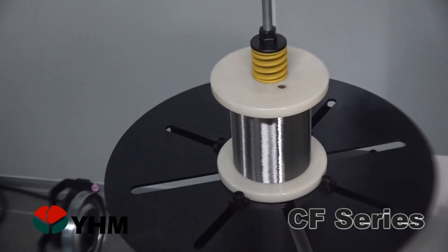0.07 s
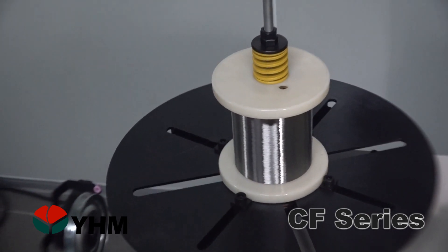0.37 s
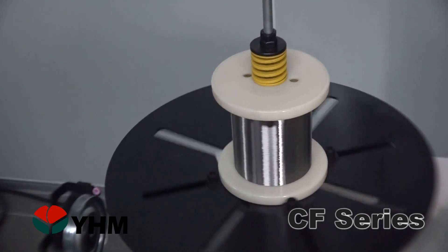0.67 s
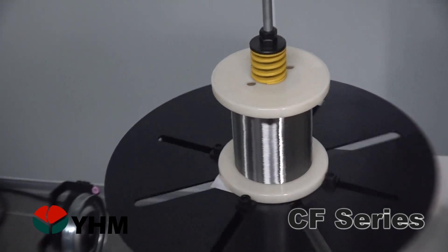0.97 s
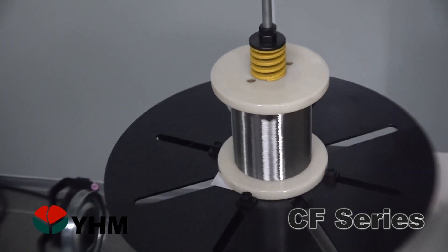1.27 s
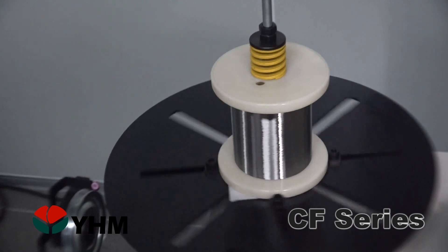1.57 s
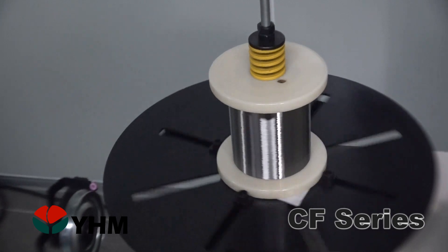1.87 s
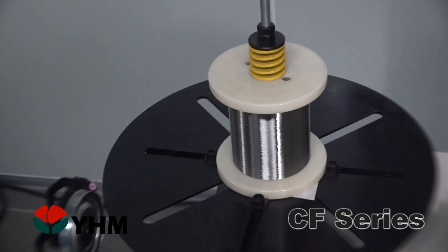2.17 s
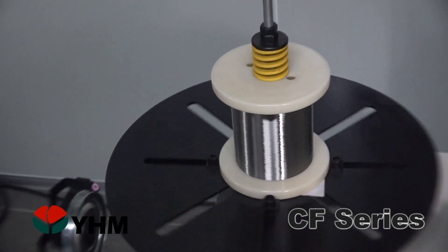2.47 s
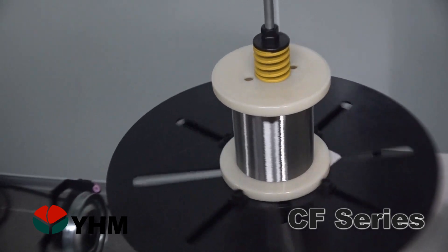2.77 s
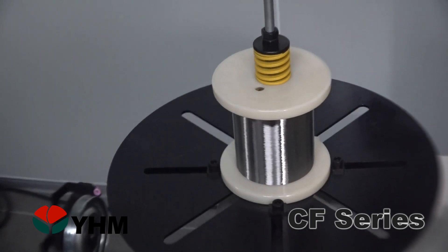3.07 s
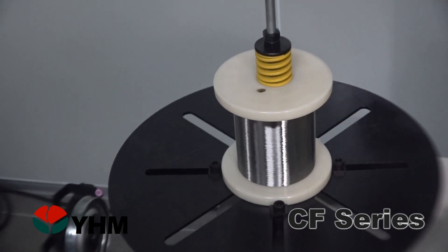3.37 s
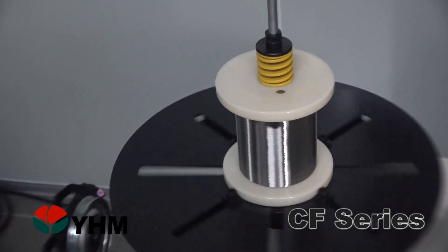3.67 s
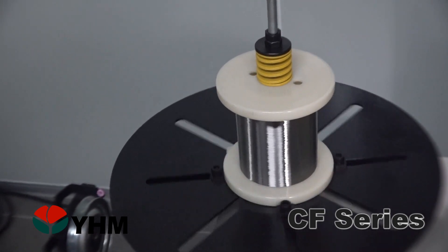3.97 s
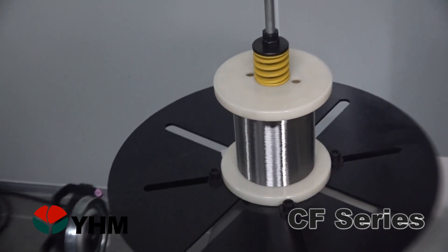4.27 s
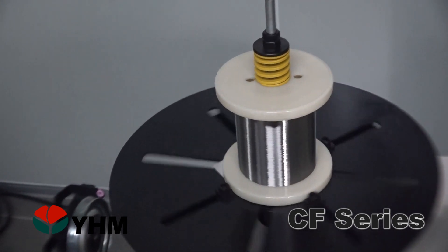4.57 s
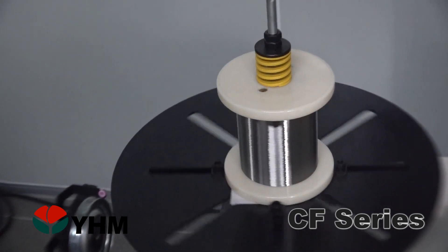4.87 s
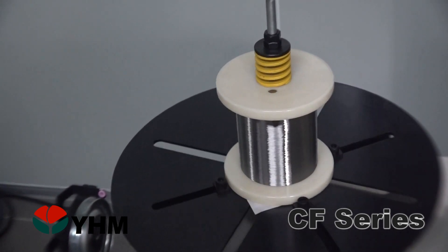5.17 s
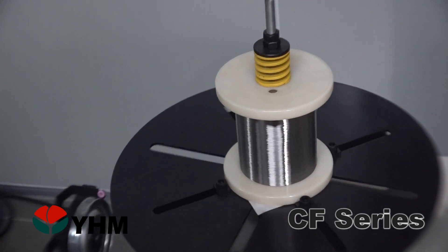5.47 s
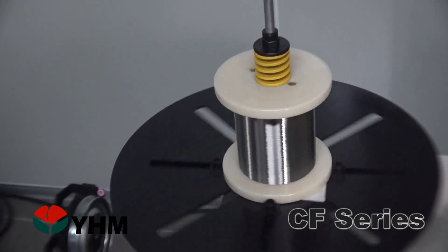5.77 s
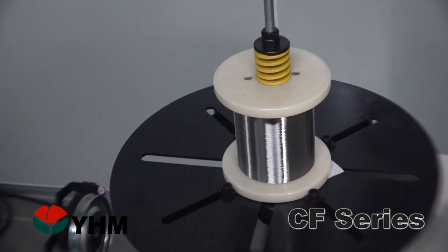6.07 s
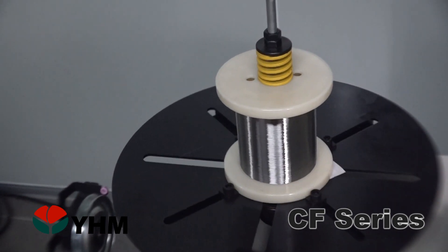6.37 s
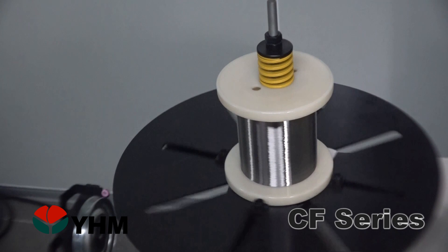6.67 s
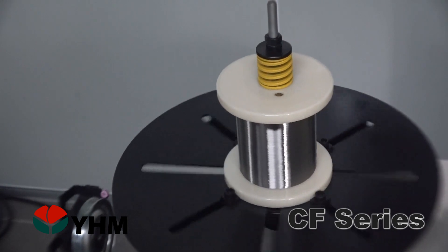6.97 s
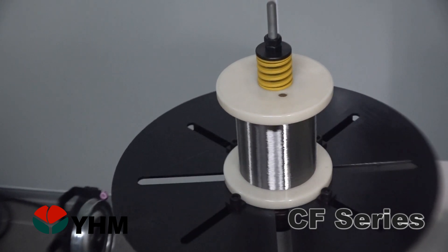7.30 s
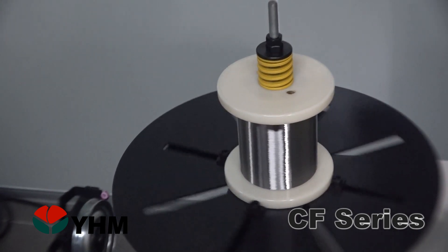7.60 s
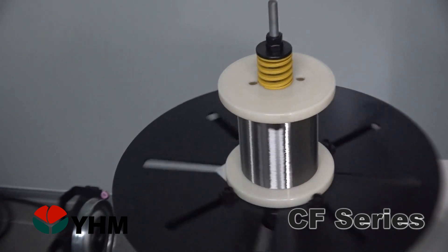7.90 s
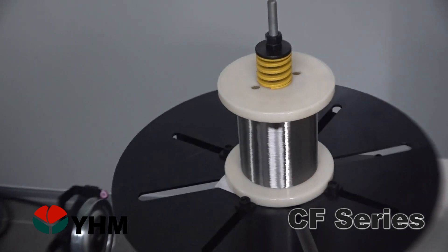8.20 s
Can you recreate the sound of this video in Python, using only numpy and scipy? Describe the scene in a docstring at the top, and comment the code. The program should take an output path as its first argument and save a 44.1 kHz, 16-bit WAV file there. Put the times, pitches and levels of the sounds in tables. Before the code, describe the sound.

A spring coiling machine runs in a workshop with a steady low motor hum and fan roar. About once a second a valve spits open and compressed air hisses for just over half a second, now and then with a faint whistle. Later blasts last slightly longer, and a quick blip comes near the end. The hiss sounds close and leaves a short echo in the hall.

```python
"""Spring coiler with air blasts

A spring coiling machine runs in a workshop, motors and fans humming over a steady roar. About once a second a
valve spits open and a jet of compressed air hisses, the later blasts mostly longer; a blip and a shorter blast
come last. Metal parts colour the jet, which at times whistles on an edge. The hiss bounces off nearby machine
parts and dies away in the hall."""
import sys
import numpy as np
from scipy import signal
from scipy.fft import rfft, irfft
from scipy.io import wavfile
from scipy.ndimage import uniform_filter1d

SR = 44100
rng = np.random.default_rng(int(sys.argv[2]) if len(sys.argv) > 2 else 0)


def unload_audio(sound):
    """Save the sound as a 16-bit wav file, at the path given as the first command line argument."""
    columns = np.transpose(np.atleast_2d(sound))
    # keep every value between -1 and 1, then stretch to whole-number steps
    steps = np.round(np.clip(columns, -1, 1) * 32767)
    wavfile.write(sys.argv[1], SR, steps.astype(np.int16))


N = 372204

# motor and fan tones: (frequency [Hz], level [dB], waver depth [ratio])
MOTOR_TONES = [(120.8, -63, .3), (151.6, -65.5, 0.7), (180.45, -49, 0.26), (189.2, -51, 0.32),
               (203.2, -64, 0.79), (210, -59.5, 0.56), (246.5, -63, 0.48), (352.4, -62, 1),
               (359.5, -57.5, 0.94), (382, -59.5, 0.54), (477.4, -57.5, 0.7), (482, -58, .5),
               (485.5, -60.5, 0.47), (536, -60, 0.43), (564.7, -56.5, 0.44), (798, -65.5, 0.47)]
# slow level ride on the low, beating pair of motor tones: (time [s], gain [dB])
DRONE_RIDE = [(0, -1.5), (2, -1.5), (3.1, 0.5), (3.6, 2.5), (5.3, 2), (5.7, -0.5), (8.44, -1)]
# slow level ride on the fan whine: (time [s], gain [dB])
WHINE_RIDE = [(0, 3), (1, 2.5), (1.6, -9.5), (2.7, 8), (3.2, -0.5), (4, 2.5), (6, -3.5), (7.5, 2),
              (8.1, -5)]
# colour of the machine roar: (frequency [Hz], relative level [dB])
ROAR_COLOUR = [(20, -24), (45, -14), (95, -13), (130, -1), (210, 0), (310, -6), (500, -5), (750, -9),
               (1300, -10), (2300, -20.5), (4600, -24), (6300, -38), (10500, -39), (15500, -47)]
# how alike the roar is left and right: (frequency [Hz], correlation [0-1])
ROAR_LIKENESS = [(30, .98), (70, 0.89), (180, 0.99), (400, 0.93), (1200, 0.88), (4000, 0.66), (12000, 0.16)]
# valve cues, one row a blast: (opens [s], starts to shut [s], shutting time [s])
BLASTS = [(.397, .968, .025), (1.411, 1.982, .025), (2.426, 2.997, .025), (3.442, 4.01, .03),
          (4.464, 5.078, .03), (5.475, 6.143, .055), (6.494, 7.203, .025), (7.503, 8.172, .055),
          (8.210, 8.305, .012), (8.425, 8.9, .025)]
# broad colour of the jet: (frequency [Hz], relative level [dB])
NOZZLE_COLOUR = [(500, -35), (1400, -21.5), (1900, -13), (2550, -16), (3100, -15), (3750, -7),
                 (4600, -11.5), (6200, -12.5), (7800, -5), (8900, -12.5), (10200, -3), (11200, -9),
                 (12700, -6.5), (13550, 0), (14700, -6)]
# narrow resonances of the metal around the jet: (frequency [Hz], width [Hz], unscaled boost [dB])
CAVITIES = [(1694, 38, 7.0), (1630, 38, 4.2), (1940, 38, 4.0), (3415, 38, 2.4), (4011, 38, 6.6),
            (4263, 59, 4.2), (4483, 38, 4.6), (4906, 38, 4.8), (5067, 79, 5.7), (5449, 53, 4.0),
            (5622, 38, 4.2), (6202, 38, 3.4), (6583, 38, 3.7), (7367, 39, 6.4), (7552, 100, 4.0),
            (7890, 41, 5.4), (8067, 43, 7.0), (8328, 57, 6.6), (8483, 38, 5.7), (8883, 130, 5.4),
            (9164, 38, 5.0), (9465, 38, 4.9), (9831, 38, 7.0), (10078, 38, 5.0), (10510, 50, 3.8),
            (10710, 38, 3.3), (11840, 38, 6.6), (12265, 40, 5.1), (13267, 38, 3.0), (13647, 38, 3.5),
            (13828, 38, 4.5), (14002, 38, 4.5), (14597, 38, 5.5)]
# colour of the spit as the valve cracks open: (frequency [Hz], relative level [dB])
SPIT_COLOUR = [(500, -7), (1200, -3), (3300, 7), (5500, -15), (9000, -19), (14000, 6.5)]
# slaps off the nearest surfaces: (delay [s], signed gain [ratio])
ECHOES = [(.001315, -.09), (.001837, -.05), (.00229, -.05), (.005034, .1), (.005261, .05), (.005714, .07),
          (.007347, -.06), (.007438, .07)]
# ring of the hall: (frequency [Hz], time to fall 60 dB [s])
HALL_DECAY = [(1000, 0.45), (4000, 1.97), (8000, 1.03), (11000, 1.13), (14000, 0.56), (16000, 0.65)]
# flares of the whistle: (peak time [s], level at steady flow [dB])
FLARES = [(.46, -44), (1.70, -40.5), (2.51, -41), (3.52, -45), (4.72, -44), (4.88, -43), (5.04, -42),
          (5.57, -43), (5.72, -45), (5.89, -44)]
# stereo balance: (frequency [Hz], left minus right [dB])
BALANCE = [(60, 0.5), (200, -0.8), (700, -1.5), (1300, -1.5), (2400, -0.5), (5000, -0.8), (9000, -1),
           (13000, -0.2)]

VALVE_OPENS_S, TOP_HZ = .006, 15780


def gain_of(db):
    """Decibels to amplitude."""
    return 10 ** (np.asarray(db) / 20)


def unit_rms(x):
    """Scales to rms 1."""
    return x / np.sqrt(np.mean(x ** 2) + 1e-20)


def curve_at(points, hz):
    """Reads a table of (frequency [Hz], value) on a log-frequency axis."""
    f, value = np.transpose(points)
    return np.interp(np.log(hz + 1), np.log(f + 1), value)


def drift(rate_hz, size=8192):
    """Slow random motion of rms 1, up to about the given rate."""
    hz = np.fft.rfftfreq(size, N / SR / size)
    slow = irfft(rfft(rng.standard_normal(size)) / (1 + (hz / rate_hz) ** 4), size)
    return unit_rms(np.interp(np.arange(N) * size / N, np.arange(size), slow))


def minimum_phase(db, size=4096):
    """Unit-energy response with the given dB spectrum, ringing only after the impulse."""
    log_gain = np.log(gain_of(np.r_[db, db[-2:0:-1]]))
    taps = np.fft.ifft(np.exp(np.conj(signal.hilbert(log_gain)))).real[:size]
    return taps / np.linalg.norm(taps)


def convolve(x, taps):
    """Plays a mono sound through one response per channel."""
    return signal.fftconvolve(x[None], np.atleast_2d(taps), axes=1)[:, :N]


def motor_hum(waver_share=0.014, side_db=-20, swell_db=2.5, swell_hz=2.2):
    """Motor and fan tones waver in level and phase; close pairs beat, and each swells at random."""
    t, out = np.arange(N) / SR, np.zeros((2, N))
    for hz, db, waver in MOTOR_TONES:
        level_db = db + swell_db * waver * drift(swell_hz)
        for low_hz, high_hz, ride in ((172, 196, DRONE_RIDE), (470, 490, WHINE_RIDE)):
            if low_hz < hz < high_hz:
                level_db += np.interp(t, *np.transpose(ride))
        waver_hz = waver_share * hz  # higher tones waver faster
        wobble = (drift(waver_hz) + 1j * drift(waver_hz)) / np.sqrt(2)
        swing = (1 + waver * wobble) / np.hypot(1, waver)
        tone = np.sqrt(2) * gain_of(level_db) * swing * np.exp(2j * np.pi * (hz * t + rng.random()))
        side = 1j * gain_of(side_db) * rng.choice([-1, 1])  # reaches one ear a little earlier
        out += np.real([tone * (1 + side), tone * (1 - side)])
    return out


def machine_roar(level_db=-42, swell_db=1.0, swell_hz=6):
    """A gently swelling bed of drive and fan noise, centred in the bass and wider in the treble."""
    hz = np.fft.rfftfreq(N, 1 / SR)
    left, other = rfft(rng.standard_normal((2, N)))
    alike = curve_at(ROAR_LIKENESS, hz)
    right = alike * left + np.sqrt(1 - alike ** 2) * other
    bed = irfft(np.array([left, right]) * gain_of(curve_at(ROAR_COLOUR, hz)), N)
    return gain_of(level_db + swell_db * drift(swell_hz)) * unit_rms(bed)


def airflow(surge_db=1.8, surge_s=.08, refill_s=.42):
    """The valve snaps open with a surge, stronger the more the hose has refilled; then the flow holds."""
    t, flow = np.arange(N) / SR, np.zeros(N)
    last_stop = -np.inf
    for start, stop, shut_s in BLASTS:
        age = np.maximum(t - start, 0)
        charge = min((start - last_stop) / refill_s, 1) ** 2
        valve = np.clip(age / VALVE_OPENS_S, 0, 1) * np.clip(1 - (t - stop) / shut_s, 0, 1)
        flow += valve * gain_of(charge * surge_db * np.exp(-age / surge_s))
        last_stop = stop
    return flow


def air_jet(flow, level_db=-28.5, flutter_db=0.86, flutter_hz=12, boost_scale=1.1, bands=16):
    """Turbulent hiss whose bands flutter apart as the stream wanders, coloured by nozzle and cavities."""
    hz = np.fft.rfftfreq(N, 1 / SR)
    white, centres = rfft(rng.standard_normal(N)), np.linspace(0, TOP_HZ, bands)
    eddies = np.zeros(N)
    for band in np.eye(bands):
        hiss = irfft(white * np.interp(hz, centres, band), N)
        eddies += hiss * gain_of(flutter_db * drift(flutter_hz))
    filter_hz = np.fft.rfftfreq(8192, 1 / SR)
    peaks = sum(db / (1 + (2 * (filter_hz - f) / width) ** 2) for f, width, db in CAVITIES)
    colour = minimum_phase(curve_at(NOZZLE_COLOUR, filter_hz) + boost_scale * peaks)
    return gain_of(level_db) * convolve(unit_rms(eddies) * flow, colour)[0]


def valve_spit(level_db=-34, fade_s=0.051):
    """The air stored behind the valve leaves first: a short puff on the front of each blast."""
    age = np.maximum(np.arange(N) / SR - np.array(BLASTS)[:, :1], 0)
    puffs = (np.clip(age / VALVE_OPENS_S, 0, 1) * np.exp(-age / fade_s)).sum(axis=0)
    colour = gain_of(curve_at(SPIT_COLOUR, np.fft.rfftfreq(N, 1 / SR)))
    noise = irfft(rfft(rng.standard_normal(N)) * colour, N)
    return gain_of(level_db) * puffs * unit_rms(noise)


def machine_echoes(air, scatter_db=-11.5, scatter_s=0.0096, side_db=-19.5, size=2048):
    """The direct hiss, combed by single echoes and a short scatter off the machine."""
    t = np.arange(size) / SR
    scatter, side = rng.standard_normal((2, size)) * np.exp(-t / scatter_s) * (t > .001)
    mid = gain_of(scatter_db) * scatter / np.linalg.norm(scatter)
    mid[0] = 1  # direct path
    for delay, gain in ECHOES:
        mid[round(delay * SR)] += gain
    side = gain_of(side_db) * side / np.linalg.norm(side)
    return convolve(air, np.array([mid + side, mid - side]))


def hall_tail(air, level_db=-7, side_db=-11, build_s=0.0071):
    """Diffuse wash of the workshop, longest near 4 kHz; above that the air swallows the treble."""
    hz, t, noise = signal.stft(rng.standard_normal((2, SR)), SR, nperseg=256)
    decay = np.exp(-np.log(1000) * t / curve_at(HALL_DECAY, hz)[:, None])
    build = 1 - np.exp(-t / build_s)
    mid, side = signal.istft(noise * decay * build, SR, nperseg=256)[1]
    side *= gain_of(side_db)
    return gain_of(level_db) * convolve(air, np.array([mid + side, mid - side]) / np.linalg.norm(mid))


def edge_whistle(flow, pitch_hz=3986, fuzz_hz=64, flare_s=0.032):
    """The jet catches an edge now and then and flares briefly into a fuzzy whistle."""
    t = np.arange(N) / SR
    fuzz = drift(fuzz_hz) + 1j * drift(fuzz_hz)
    tone = unit_rms((fuzz * np.exp(2j * np.pi * pitch_hz * t)).real)
    flares = sum(gain_of(db) * np.exp(-((t - peak_s) / flare_s) ** 2) for peak_s, db in FLARES)
    return flares * flow * tone


def lean_right(sound):
    """The machine stands slightly to the right."""
    tilt_db = curve_at(BALANCE, np.fft.rfftfreq(N, 1 / SR))
    return irfft(rfft(sound) * gain_of([tilt_db / 2, -tilt_db / 2]), N)


def ride_width(sound, pause_db=-24, lead_s=0.028, linger_s=0.032, narrow_db_per_s=130):
    """The image is wide while the air blows and narrows to the centre in the pauses."""
    t = np.arange(N) / SR
    width_db = np.full(N, float(pause_db))
    for start, stop, _ in BLASTS:
        narrowing_db = -narrow_db_per_s * np.maximum(t - stop - linger_s, 0)
        width_db = np.where(t > start - lead_s, np.maximum(narrowing_db, pause_db), width_db)
    width = gain_of(uniform_filter1d(width_db, size=1500))
    centre = sound.mean(axis=0)
    return centre + width * (sound - centre)


def scene():
    """Air blasts with their echoes and tail, over a bed of hum and roar."""
    flow = airflow()
    air = air_jet(flow) + valve_spit() + edge_whistle(flow)
    mix = machine_echoes(air) + hall_tail(air) + motor_hum() + machine_roar()
    return ride_width(lean_right(mix))


def record(dry):
    """A steep low-pass trims the very top of the hiss."""
    low_pass = signal.firwin(1023, TOP_HZ, window=("kaiser", 9), fs=SR)
    return signal.oaconvolve(dry, low_pass[None], "same")


dry = scene()
out = record(dry)
unload_audio(out)
```